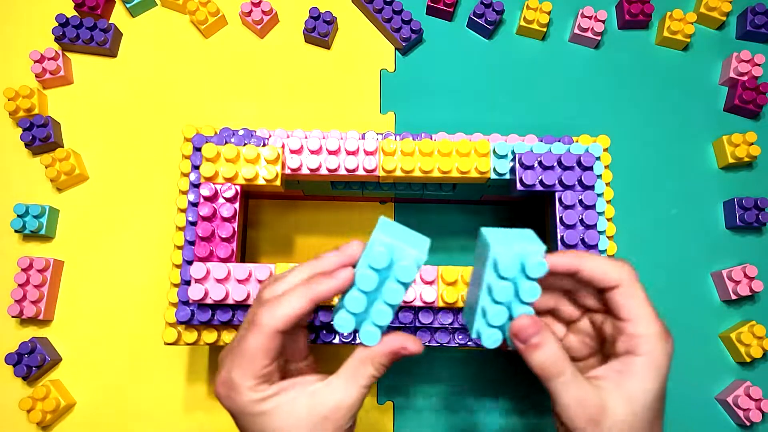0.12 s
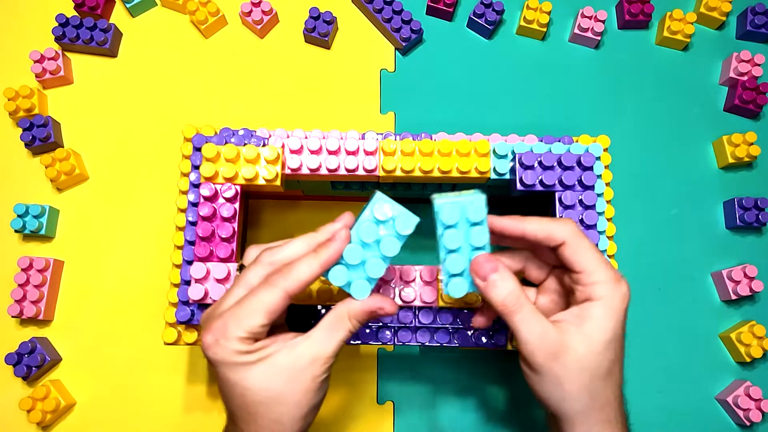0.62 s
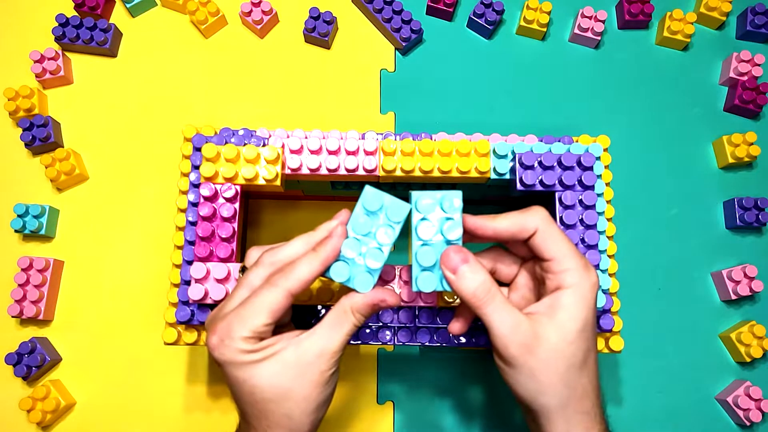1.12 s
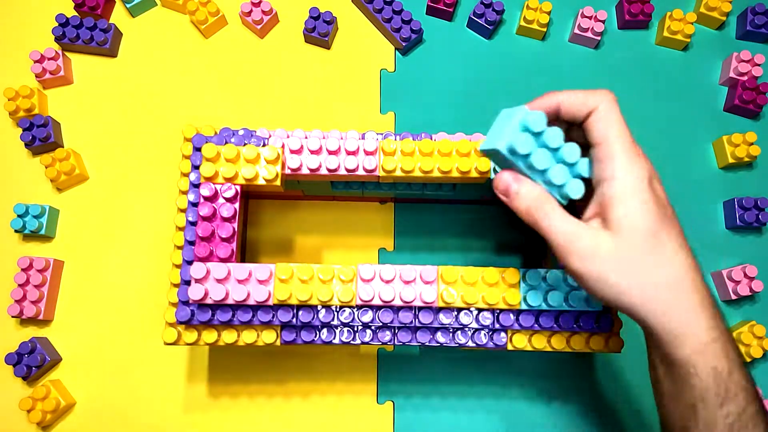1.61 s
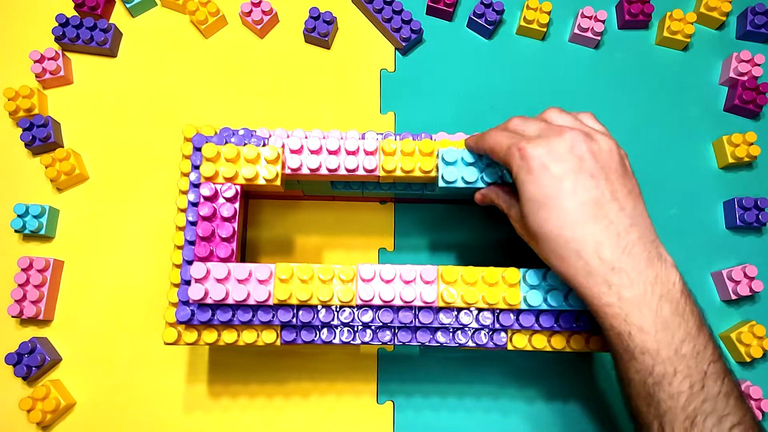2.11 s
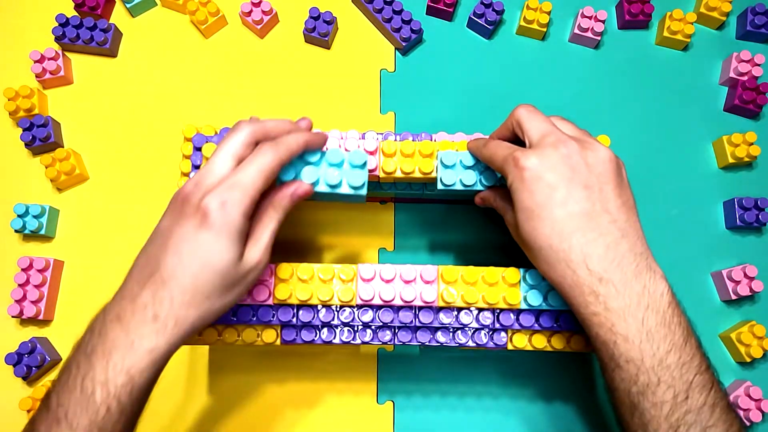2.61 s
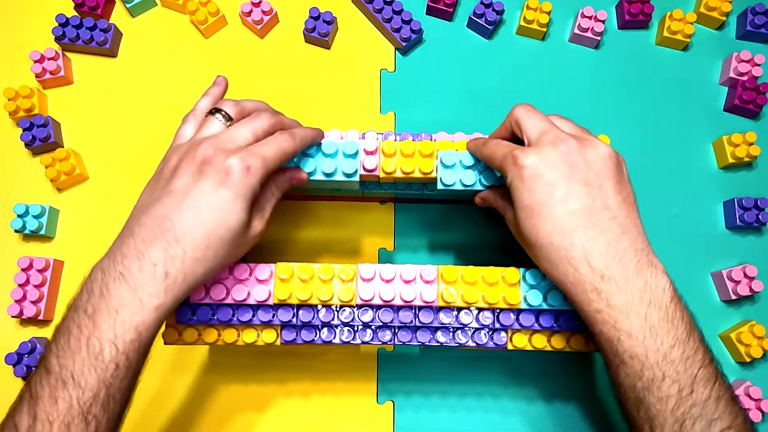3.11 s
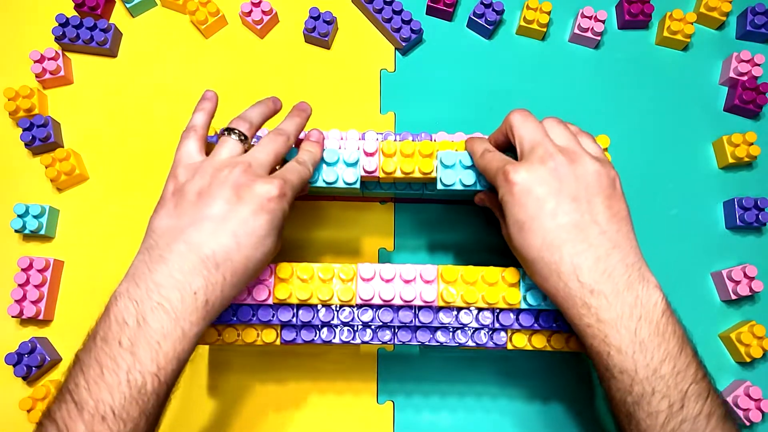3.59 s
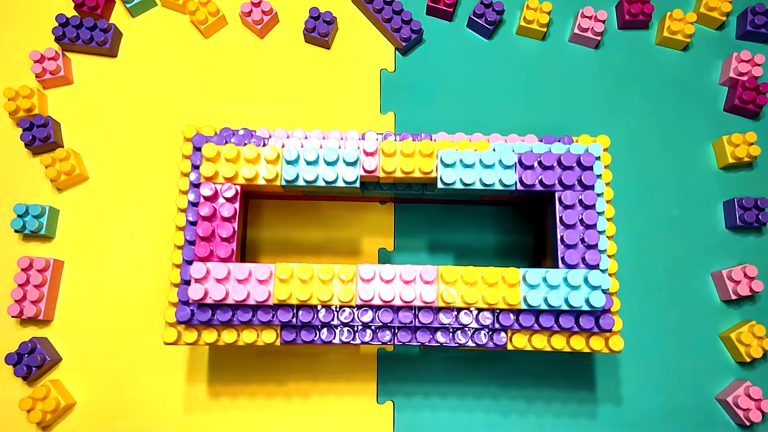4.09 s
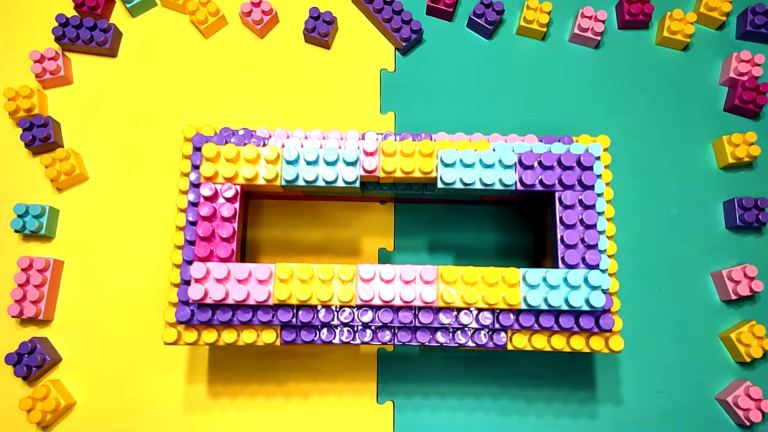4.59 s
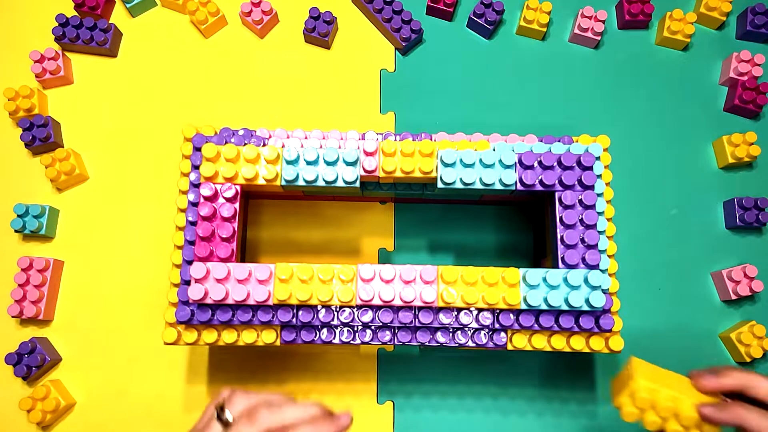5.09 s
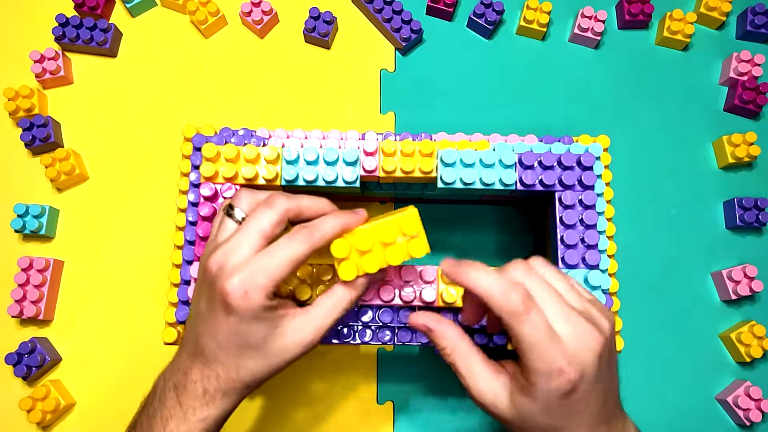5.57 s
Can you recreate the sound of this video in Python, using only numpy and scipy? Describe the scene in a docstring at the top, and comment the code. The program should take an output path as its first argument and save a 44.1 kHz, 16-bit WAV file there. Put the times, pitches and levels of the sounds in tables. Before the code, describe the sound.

Two hollow plastic bricks clack together five times, then studs snap onto a brick wall in small clusters, over faint hum in a small room.

```python
"""Two motors hum and beat over a dull background hiss while fingers rustle and bricks scuff softly.
Hands tap hollow plastic bricks together, turn them, then snap them onto a wall of bricks on a foam mat.
Blows ring damped modes, the rustle is shaped noise, the mat thumps are short sines.
A small room throws the clicks back as sparse, dying echoes; a soft wash trails the taps."""
import sys
import numpy as np
from scipy import signal
from scipy.fft import rfft, irfft, next_fast_len
from scipy.io import wavfile
from scipy.ndimage import uniform_filter1d

SR = 44100
rng = np.random.default_rng(int(sys.argv[2]) if len(sys.argv) > 2 else 0)


def wav_record(signal):
    """Record a signal, one row per channel, as 16-bit PCM in the file named by sys.argv[1]."""
    frames = np.transpose(np.atleast_2d(signal))
    bounded = np.clip(frames, -1, 1)
    # unit amplitude maps onto the largest positive 16-bit level
    quanta = np.round(bounded * 32767).astype(np.int16)
    wavfile.write(sys.argv[1], SR, quanta)


def ratio_of_db(decibels):
    """Turn decibels (scalar or array-like) into linear amplitude factors; 0 dB maps to 1."""
    return 10 ** (np.asarray(decibels, float) / 20)


N = 251370  # samples
RING = 4096  # samples in one ring
MAX_Q = 11  # plastic damps every mode at least this much


def evened(x):
    """Scales to rms 1."""
    return x / np.sqrt(np.mean(x ** 2) + 1e-20)


def read(points, hz):
    """Reads a spectrum on a log-frequency axis."""
    f, value = np.transpose(points)
    return np.interp(np.log(hz + 1), np.log(f + 1), value)


def add(mix, s, sound):
    """Mixes a sound into both channels at time s."""
    part = mix[:, round(s * SR):][:, :sound.shape[1]]
    part += sound[:, :part.shape[1]]


def hiss(spectrum, same, patchy_db):
    """Two-channel noise of rms 1 from random short-time spectra with drifting patches."""
    frames, hz = N // 256 + 5, np.fft.rfftfreq(1024, 1 / SR)
    a, b, c, d, patches = rng.standard_normal((frames, 513, 5)).T
    patches = uniform_filter1d(patches, size=12, axis=0)
    patches = evened(uniform_filter1d(patches, size=10, axis=1))
    same = np.clip(same * np.ones(513), -1, 1)[:, None]
    left = a + 1j * b
    right = same * left + np.sqrt(1 - same ** 2) * (c + 1j * d)
    z = np.array([left, right])
    z *= ratio_of_db(read(spectrum, hz)[:, None] + patchy_db * patches)
    return evened(signal.istft(z, nperseg=1024, noverlap=768)[1][:, :N])


def strokes(rows):
    """Gain of strokes that each swell to a peak and die away."""
    t = np.arange(0, N + 50, 50) / SR
    s, db, rise, fall = np.transpose(rows)[:, :, None]
    before, after = (s - t) / np.maximum(rise, .003), (t - s) / np.maximum(fall, .003)
    away = np.where(t < s, before, after)
    return np.interp(np.arange(N) / SR, t, ratio_of_db(db - 20 * away).max(0))


def causal(gain):
    """The shortest ring with this magnitude spectrum: minimum phase by folded cepstrum."""
    cepstrum = irfft(np.log(gain + 1e-9))
    half = len(cepstrum) // 2
    cepstrum[..., 1:half] *= 2
    cepstrum[..., half + 1:] = 0
    return irfft(np.exp(rfft(cepstrum)))


def resonances(modes, low_hz, spread_db):
    """Power spectrum of each mode, varying with the strike point; small objects send out little bass."""
    centre, width, db = np.transpose(modes)[:, :, None]
    hz = np.fft.rfftfreq(RING, 1 / SR)
    detune, level = rng.standard_normal((len(modes), 2)).T[:, :, None]
    away = (hz - centre * (1 + 0.027 * detune)) / np.maximum(width, centre / MAX_Q)
    peak = ratio_of_db(db + spread_db * level) ** 2 / (1 + 3.14 * away ** 2) ** 1.746
    return peak / (1 + (low_hz / (hz + 1)) ** 4.0)


def rattle(ms, rise_ms, first):
    """A first touch and a dying chatter, a little different at either port, with no colour of its own."""
    t_ms = 1000 * np.arange(RING // 2) / SR
    both, *own = rng.standard_normal((3, len(t_ms)))
    chatter = both + .55 * np.array(own)
    contact = chatter * np.exp(-t_ms / max(ms, .1)) * (1 - np.exp(-t_ms / max(rise_ms, .02)))
    contact[:, 0] = first
    spectrum = rfft(contact, RING)
    colour = np.sqrt(uniform_filter1d(abs(spectrum) ** 2, size=60, axis=1))
    return irfft(spectrum / np.array([rfft(causal(port)) for port in colour]))


def knocks(rows, modes, edges_hz, groups, ms, rise_ms, low_hz, pan_db, first):
    """Each blow rings its groups of modes: rattled by the contact close by, smooth as the room gathers it."""
    group = np.searchsorted(edges_hz, np.transpose(modes)[0])
    base_db, by_edge, by_body = np.transpose(groups)
    near, spread = np.zeros((2, N)), np.zeros((2, N))
    for s, level_db, edge_db, body_db in rows:
        power = resonances(modes, low_hz, spread_db=-2.5)
        parts = [power[group == k].sum(0) for k in range(len(groups))]
        peaks = [abs(causal(np.sqrt(part))).max() for part in parts]
        groups_db = level_db + base_db + by_edge * edge_db + by_body * body_db
        blow = sum(part * (ratio_of_db(db) / top) ** 2 for part, db, top in zip(parts, groups_db, peaks))
        ring = causal(np.sqrt(blow))
        ring *= (1 + ms) ** 0.28  # a longer contact hands over more energy
        add(near, s, signal.fftconvolve(rattle(ms, rise_ms, first), ring[None], axes=1))
        add(spread, s, np.array([ring, ring]))
    pan = ratio_of_db(pan_db * np.array([[.5], [-.5]]))
    return np.array([near * pan, spread])


# Background: dull hiss, almost nothing above 12.8 kHz.
# Each row: frequency in Hz, relative level in dB per Hz.
BACKGROUND_SPECTRUM = [(15, 8), (50, -7.5), (90, -6.5), (160, -5.5), (250, -4), (400, -5.5), (630, -10.5),
                       (1000, -16.5), (2000, -25.5), (3200, -26), (5500, -30.5), (8500, -30.5),
                       (11500, -33.5), (12800, -71), (16000, -71)]
# Each row: frequency in Hz, left-right likeness (1 same, -1 opposite).
BACKGROUND_LIKENESS = [(60, -0.39), (180, 0.54), (550, 0.31), (1650, -0.53), (4970, 0.66), (15000, -2.3)]
BACKGROUND_RMS_DB = -62


def background():
    """Dull background hiss, partly alike in both channels."""
    likeness = read(BACKGROUND_LIKENESS, np.fft.rfftfreq(1024, 1 / SR))
    return ratio_of_db(BACKGROUND_RMS_DB) * hiss(BACKGROUND_SPECTRUM, likeness, patchy_db=1.3)


# Each row: one motor, turns per second, then the orders heard.
MOTORS = [(61.55, 1, 2, 3, 6), (62.52, 2, 4, 6)]
# Each row: one motor, rms level in dB of each of its orders.
ORDER_DB = [(-98, -66.5, -74.5, -75.5), (-67, -75.5, -81)]
BEAT_DIP_S = 0.38  # the two strongest lines oppose here


def hum():
    """Steady orders of two motors running at slightly different speeds."""
    t, out = np.arange(N) / SR - BEAT_DIP_S, np.zeros(N)
    for sign, (turns, *orders), levels in zip((1, -1), MOTORS, ORDER_DB):
        for order, db in zip(orders, levels):
            out += sign * np.sqrt(2) * ratio_of_db(db) * np.cos(2 * np.pi * order * turns * t)
    return out


# Rustle swells: mostly fingers, with the trailing wash after the taps at 1.08 s.
# Each row: peak time in seconds, level in dB, rise and fall over 20 dB in seconds.
RUSTLE_SWELLS = [(0.054, -62.5, 0.22, 0.13), (0.24, -69.5, 0.19, 0.043), (1.08, -61.5, 0.074, 0.066),
                 (1.162, -54.5, 0.016, 0.094), (1.44, -70.5, 0.67, 0.018), (1.52, -70.5, 0.011, 0.2),
                 (1.654, -62, 0.037, 0.25), (2.438, -74.5, 0.038, 0.18), (3.48, -66, 0.016, 0.06),
                 (3.75, -66.5, 0.037, 0.031), (3.805, -66.5, 0.0072, 0.043), (4.05, -68.5, 0.076, 0.12),
                 (4.53, -86.5, 0.043, 0.66), (4.69, -68, 0.065, 0.12), (4.96, -60, 0.035, 0.19),
                 (5.31, -69, 0.22, 0.82)]
# Colour of the rustle. Each row: frequency in Hz, relative level in dB per Hz.
RUSTLE_SPECTRUM = [(410, -44.5), (700, -8.5), (841, -5), (898, -10.5), (1280, -9.5), (1770, -13.5),
                   (3240, -10.5), (5190, -14), (8310, -7.5), (10900, -11.5), (16000, -52)]


def rustle():
    """Gritty noise in swells: mostly fingers on plastic, once the wash trailing the taps."""
    grit = ratio_of_db(2.1 * evened(uniform_filter1d(rng.standard_normal(N), size=250)))
    noise = ratio_of_db(3.0) * hiss(RUSTLE_SPECTRUM, 0.1, patchy_db=1.5)
    return uniform_filter1d(strokes(RUSTLE_SWELLS), size=900) * grit * noise


# Modes of a hollow brick. Each row: centre in Hz, least width in Hz, level in dB within its group.
BRICK_MODES = [(774, 1600, -2), (1314, 130, 13.5), (2060, 280, -5), (2590, 660, -4), (3240, 120, -8.5),
               (3660, 230, -10), (4830, 2100, -22), (6500, 450, -5.5), (6700, 2400, 20.5), (7700, 900, 14),
               (8490, 2400, 41.5), (11300, 1200, -16), (14700, 810, -23)]
# Borders between the mode groups, in Hz.
BRICK_EDGES_HZ = (1600, 2900, 5600)
# Mode groups, low to high. Each row: offset in dB, share of the edge dB, share of the body dB.
BRICK_GROUPS = [(-17, 0, 1.1), (-4, 0, 0.9), (0, 0, 0), (11, 1, 0)]


def loose_knocks(rows, **contact):
    """Blows on a hollow brick: a sharp edge lifts the high modes, a flat face the low ones."""
    return knocks(rows, BRICK_MODES, BRICK_EDGES_HZ, BRICK_GROUPS, **contact)


# Bricks turned and lifted. Each row: start in seconds, level in dB, edge in dB, body in dB.
SCUFF_ROWS = [(0.036, -47, -30, -4), (0.074, -70, -15, 25), (0.146, -60, -25, 8), (0.171, -56, -27, 11.5),
              (0.365, -50.5, 0, 8.5), (1.153, -45.5, -26, -20), (1.282, -59.5, 5.5, 6.5),
              (1.377, -56.5, -25, -4), (1.42, -48.5, -8.5, -9), (1.521, -49.5, -7.5, -6),
              (1.557, -53, -12, -6), (1.651, -48, -20, 3.5), (1.712, -68, -4, 6), (3.748, -66.5, 7.5, 5.5),
              (4.044, -71, -4, 6), (4.671, -49, -14, -26), (4.759, -55, -10, 2), (4.88, -59, -13, 1),
              (4.975, -49, -8.5, -1), (5.551, -68, 6.5, 3)]


def scuffs():
    """Bricks scuff as hands turn and lift them: long contacts that swell in with no first touch."""
    return loose_knocks(SCUFF_ROWS, ms=7.0, rise_ms=9.0, low_hz=800, pan_db=2.0, first=0.0)[0]


# Room decay. Each row: frequency in Hz, t60 in seconds.
ROOM_T60 = [(250, 0.14), (700, 0.31), (1500, 0.35), (3000, 0.26), (6000, 0.3), (10000, 0.28), (15000, 0.12)]
ECHO_CLUMPS_DB = 3.0  # furniture and walls bunch the echoes


def room(x, gap_s=.004):
    """Sparse taps of random sign, each band dying at its own speed; three tails take turns."""
    out, t = np.zeros((2, N)), np.arange(N) / SR
    for k in range(3):
        taps = np.zeros((2, SR // 2))
        at = np.arange(round(gap_s * SR), SR // 2 - 10, 10)
        at = at + rng.integers(0, 10, (2, len(at)))
        np.put_along_axis(taps, at, rng.choice([-1., 1.], at.shape), 1)
        clumps = evened(uniform_filter1d(rng.standard_normal(taps.shape), size=80, axis=1))
        taps *= ratio_of_db(ECHO_CLUMPS_DB * clumps)
        taps[1] += 0.36 * taps[0]  # the ports are close and share part of the echoes
        hz, s, z = signal.stft(taps, SR, nperseg=128)
        soft_db = -2.5 * np.log2(1 + hz / 5000)[:, None]  # soft walls swallow some treble
        decay_db = -60 * s / read(ROOM_T60, hz)[:, None]
        tail = signal.istft(z * ratio_of_db(soft_db + decay_db), SR, nperseg=128)[1]
        tail /= np.linalg.norm(tail, axis=1)[:, None]
        turn = np.sqrt(2 / 3) * np.cos(2 * np.pi * (1.9 * t + k / 3))
        out += signal.fftconvolve(x * turn, tail, axes=1)[:, :N]
    return out


# Weight landing on the mat. Each row: start in seconds, level in dB, frequency in Hz.
THUMP_ROWS = [(0.066, -47.5, 290), (2.208, -49, 185), (3.297, -38, 222)]


def thumps():
    """The foam mat gives a short dull ring."""
    out, t = np.zeros((2, N)), np.arange(SR // 5) / SR
    push = t / 0.0079 * np.exp(1 - t / 0.0045)
    for s, db, hz in THUMP_ROWS:
        add(out, s, ratio_of_db(db) * push * np.sin(2 * np.pi * hz * t)[None])
    return out


# Loose bricks knocked together. Each row: start in seconds, level in dB, edge in dB, body in dB.
TAP_ROWS = [(0.248, -18.5, -12.5, -8.5), (0.4493, -18.5, -1, -2.5), (0.645, -19.5, 2, 0),
            (0.84, -16.5, 0, 0), (0.959, -15, -2, -15.5), (4.961, -47, -6, 0), (5.447, -71, 10, -13)]
MAT_ECHO_DB, MAT_ECHO_S = -6, .0017


def taps():
    """Two bricks meet in a short hard contact; the mat below throws the tap back."""
    out = loose_knocks(TAP_ROWS, ms=1.3, rise_ms=0.17, low_hz=550, pan_db=-3.5, first=0.87)
    out[0] += ratio_of_db(MAT_ECHO_DB) * np.roll(out[0], round(MAT_ECHO_S * SR), axis=1)
    return out


# Studs catching and seating. Each row: start in seconds, level in dB, edge in dB, weight in dB.
SNAP_ROWS = [(1.954, -29.5, -17.5, -5), (2.023, -39, 6.5, 1), (2.086, -30.5, 5.5, -11),
             (2.205, -32, -9.5, -5.5), (2.211, -39.5, -2, -8), (2.892, -42.5, 5.5, 6.5),
             (2.915, -36, 6.5, 2), (2.958, -36.5, -0.5, -2), (3.175, -36.5, 4.5, -10.5),
             (3.289, -42.5, 15, 4), (3.478, -55, 4, -2), (3.806, -51, -1, -2.5)]
# Modes of the wall on its mat. Each row: centre in Hz, least width in Hz, level in dB within its group.
WALL_MODES = [(205, 72, -3), (320, 25, -37), (408, 230, -4.5), (571, 22.4, 8.5), (645, 74, -2.5),
              (783, 370, -1), (1280, 200, 3), (1540, 440, 1.5), (2408, 43, 3.5), (2730, 840, 7),
              (3380, 300, -2.5), (4000, 620, -9.5), (5100, 730, -18), (6800, 1700, 15.5),
              (8820, 2400, 23.5), (9500, 800, -31), (10200, 1000, -25), (13300, 800, -49)]
# Borders between the mode groups, in Hz.
WALL_BORDERS_HZ = (1000, 1600, 3200, 5600)
# Mode groups, low to high. Each row: offset in dB, share of the edge dB, share of the weight dB.
WALL_ANSWERS = [(-0.5, 0.2, 1), (-5.5, -0.06, 0.024), (1.5, 0.13, 0.05), (-9, 0.7, -0.48),
                (2.5, 0.6, -0.074)]


def snaps():
    """Studs snap home and ring the whole wall; weight drives its lowest modes."""
    return knocks(SNAP_ROWS, WALL_MODES, WALL_BORDERS_HZ, WALL_ANSWERS, ms=2.25, rise_ms=0.65,
                  low_hz=174, pan_db=-1.0, first=1.054)


# Creaks under the pressing hand. Each row: peak time in seconds, level in dB,
# rise and fall over 20 dB in seconds.
CREAKS = [(2.026, -52.5, 0.015, 0.07), (2.096, -44, 0.033, 0.037), (2.21, -45, 0.013, 0.039),
          (2.922, -49, 0.023, 0.048), (2.964, -38.5, 0.042, 0.013), (3.298, -47, 0.025, 0.039)]


def creak():
    """Uneven slips of studs in their sockets shake the low modes of the wall."""
    slips = (rng.random(N) < 700 / SR) * rng.standard_normal(N)  # about 700 a second
    low = [mode for mode in WALL_MODES if mode[0] < WALL_BORDERS_HZ[0]]
    ring = causal(np.sqrt(resonances(low, 300, spread_db=0).sum(0)))
    shaken = evened(signal.oaconvolve(slips, ring)[:N])
    return shaken * uniform_filter1d(strokes(CREAKS), size=200)


def scene():
    """Bricks and hands close by, their echoes, the hum and the background hiss."""
    scuffing = scuffs()
    tap_near, tap_spread = taps()
    wall_near, wall_spread = snaps() + creak() + thumps()
    echoes = room(ratio_of_db(-4.5) * tap_spread + ratio_of_db(-4) * scuffing + ratio_of_db(-4.5) * wall_spread)
    return background() + hum() + rustle() + scuffing + echoes + tap_near + wall_near


def top_cut(x):
    """Nothing passes above the cut-off."""
    return signal.sosfilt(signal.butter(12, 16580, fs=SR, output="sos"), x)


# Microphone ports. Each row: frequency in Hz, left over right in dB.
PORT_BALANCE = [(60, 5.5), (150, 8.5), (380, 11), (950, 9.5), (2380, 6), (5980, 0.5), (15000, 5.5)]
LEFT_LAG_S = 5.4e-5


def record(dry):
    """Two microphone ports of unequal colour, the left one a little later."""
    size = next_fast_len(N)
    hz = np.fft.rfftfreq(size, 1 / SR)
    half = ratio_of_db(read(PORT_BALANCE, hz) / 2) * np.exp(-1j * np.pi * hz * LEFT_LAG_S)
    top = 1 / np.sqrt(1 + (hz / 14000) ** 8.0)  # the microphone fades in the top treble
    ported = irfft(rfft(dry, size) * top * np.array([half, 1 / half]), size)[:, :N]
    return top_cut(ported)


dry = scene()
out = record(dry)
wav_record(out)
```